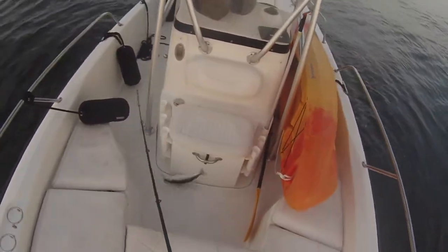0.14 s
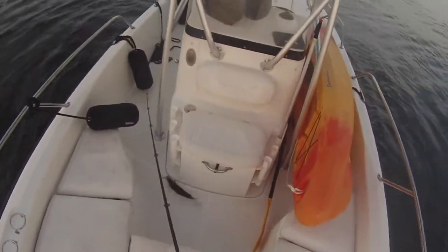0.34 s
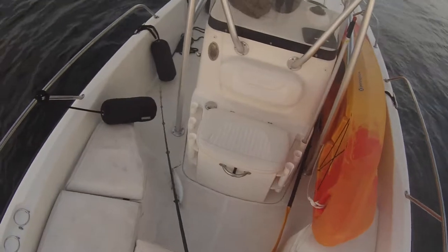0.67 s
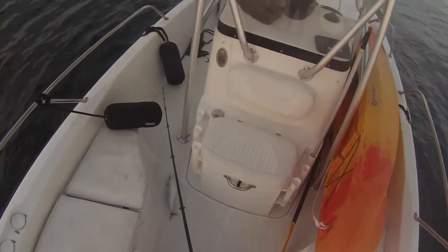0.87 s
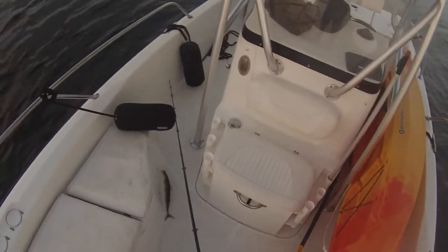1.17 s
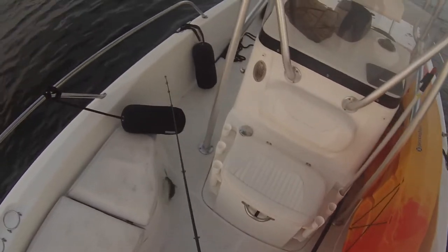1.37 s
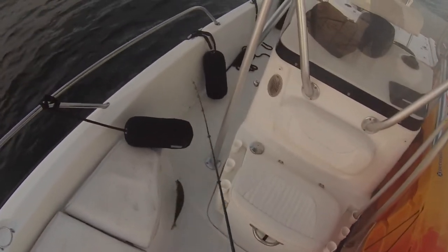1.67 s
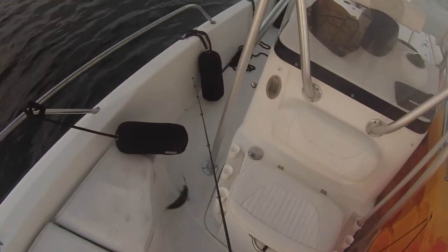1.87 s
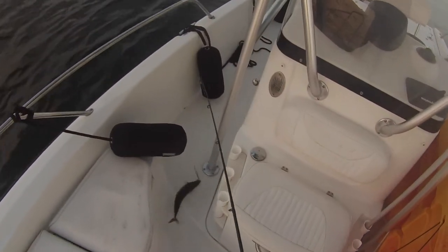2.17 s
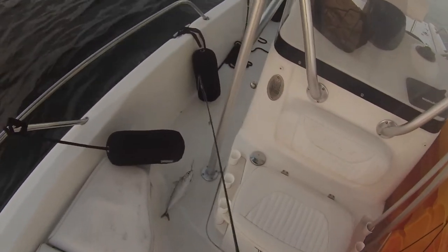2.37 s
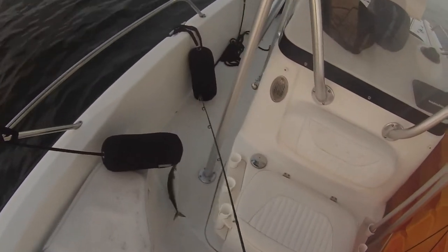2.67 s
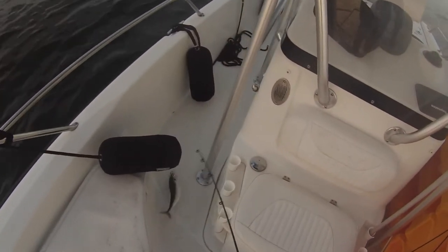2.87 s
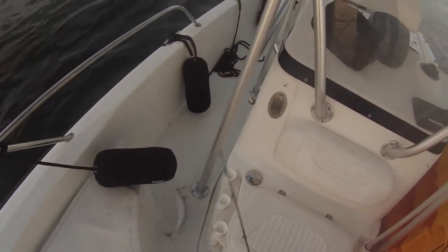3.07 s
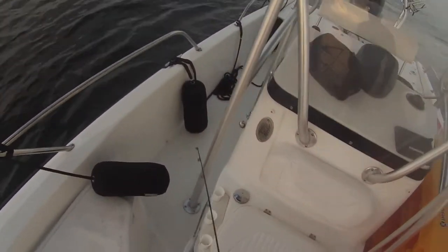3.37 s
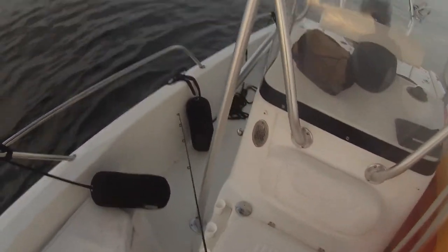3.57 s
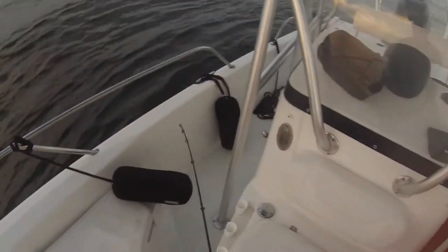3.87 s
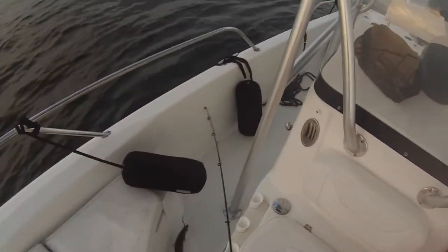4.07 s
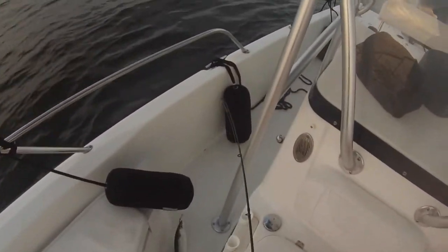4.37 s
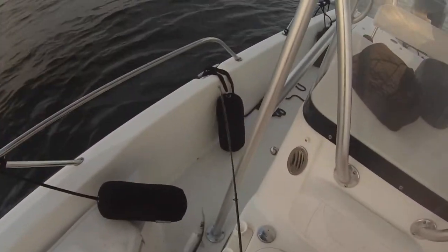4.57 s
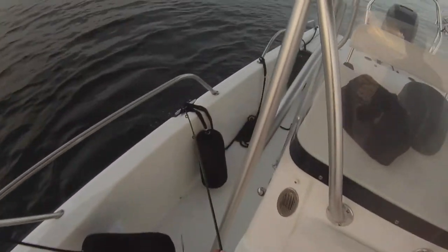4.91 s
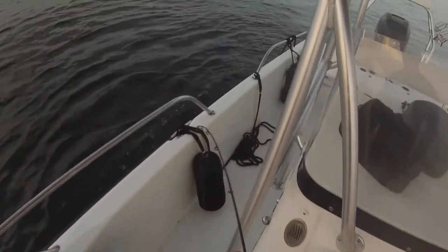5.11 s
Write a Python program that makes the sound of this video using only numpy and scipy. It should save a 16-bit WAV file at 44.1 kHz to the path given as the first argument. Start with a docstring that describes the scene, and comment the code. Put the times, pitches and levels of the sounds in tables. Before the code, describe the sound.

A small fish flops on a boat's hollow deck, light wet slaps and dull thuds over low engine rumble and soft water hiss.

```python
"""Engine rumble, a faint hum and the hiss of water and air run throughout, heard inside a closed camera case.
A fish flops on a small boat's fiberglass deck: light slaps from 0.1 s, the loudest cluster at 1.21 s.
Slaps ring deck modes and throw spray noise; dull thuds through the hull are loudest from 2.3 to 3.6 s.
Jolts are low swings of the microphone, strongest near 3.6 s; a thin metallic ring flutters at 4.7 s,
and one more strong jolt follows near 5 s. Short noise makes rubs, rattles and narrow bands of faint high hiss."""
import sys
import numpy as np
from scipy import signal
from scipy.fft import rfft, irfft
from scipy.io import wavfile
from scipy.ndimage import uniform_filter1d

SR = 44100
rng = np.random.default_rng(int(sys.argv[2]) if len(sys.argv) > 2 else 0)


def unload_wav(signal):
    """Save mono or channel-first audio to the path in sys.argv[1] as 16-bit WAV at rate SR, clipped to [-1, 1]."""
    wavfile.write(
        sys.argv[1],
        SR,
        np.round(np.clip(np.atleast_2d(signal).T, -1, 1) * 32767).astype(np.int16),
    )


N = 231354
T_S = np.arange(N) / SR

# Hiss level. Each row: time in seconds, then nominal low, middle and high band levels in dB.
WASH_LEVELS = [(0.0, -58, -61.5, -67), (0.16, -57, -59.5, -66), (0.38, -56, -62, -67),
               (0.7, -57.5, -61, -67), (1.2, -57.5, -63, -67), (1.59, -57, -62.5, -67),
               (1.74, -58.5, -58, -65.5), (1.93, -57, -61.5, -66.5), (3.2, -58.5, -64, -66),
               (3.54, -53, -59, -66), (3.75, -57.5, -62, -67), (4.05, -58, -62, -67),
               (4.4, -58, -65.5, -67.2), (4.86, -56, -63.5, -67), (5.25, -58, -64.5, -67)]
# Hiss spectrum. Each row: frequency in Hz, relative density in dB per Hz.
WASH_SPECTRUM = [(35, -39), (60, -3), (85, -5), (152, -6.5), (375, -11), (422, -11), (463, -11.5),
                 (508, -12.5), (866, -15), (1350, -15.5), (1660, -15), (2090, -10.5), (2830, -17.5),
                 (4940, -25), (15400, -41)]
# Resonances of the hollow camera case. Each row: centre in Hz, width in Hz, lift in dB before halving.
CASE_RESONANCES = [(1335, 84, 15.5), (1970, 200, -14)]
# Independent noise, opposite in the two channels, so the two channels differ slightly. # Each row: frequency in
# Hz, level in dB relative to the common noise.
WIDENING_SPECTRUM = [(60, -62), (130, -54), (290, -35), (640, -22.5), (1410, -32.5), (3100, -18),
                     (6820, -9), (15000, -22)]
# Engine rumble level. Each row: time in seconds, level in dB before the lumps.
RUMBLE_LEVELS = [(0.0, -57.5), (0.2, -45.5), (0.5, -46), (0.62, -45), (0.78, -53.5), (0.91, -43),
                 (1.1, -52.5), (1.3, -45.5), (1.5, -53), (1.8, -48), (2.1, -49.5), (2.55, -51.5),
                 (2.95, -46.5), (3.3, -44.5), (4.0, -45), (4.4, -49), (4.85, -42), (5.25, -48)]
# Engine rumble spectrum. Each row: frequency in Hz, relative density in dB per Hz.
RUMBLE_SPECTRUM = [(5.9, -31), (10, 2), (27, -0.5), (41, 0), (58, -9.5), (63, -12.5), (71, -22), (130, -24),
                   (170, -55), (290, -120)]
# Hum level. Each row: time in seconds, level in dB before the wavering.
HUM_LEVELS = [(0.0, -68.5), (0.6, -84), (1.38, -69), (1.7, -74.5), (2.95, -67), (3.6, -72), (3.82, -61.5),
              (4.2, -70.5), (4.7, -65.5), (5.25, -74)]
# Jolts of the camera on its mount. Each row: crest time in seconds, swing level in dB, frequency in Hz,
# Gaussian length (sigma) in seconds, direction +-1, lead of the envelope over the crest in seconds.
JOLTS_TABLE = [(1.361, -35.5, 25, 0.012, 1, .001), (1.658, -36, 30, .012, 1, .001),
               (1.735, -35.5, 25, 0.017, 1, .001), (3.252, -33, 29.8, 0.022, 1, .001),
               (3.375, -35.5, 38, 0.016, 1, .001), (3.566, -13.5, 36.8, 0.013, 1, .003),
               (3.629, -11, 43, 0.008, -1, 0.00093), (3.647, -10, 39.3, 0.011, 1, 0.00078),
               (3.702, -24, 29.5, 0.016, 1, .001), (3.837, -31.5, 31.2, 0.014, 1, .001),
               (4.982, -13.5, 32, 0.014, 1, 0.004)]
# Brief rubs, rattles and narrow bands of faint high hiss. Each row: start in seconds, length in seconds,
# level in dB before the edge fades, centre in Hz, width in Hz.
SLIDES_TABLE = [(.851, .007, -65.5, 6000, 3500), (1.2106, 0.0047, -40.5, 5930, 907),
                (3.442, 0.018, -48.5, 602, 500), (3.478, 0.038, -54.5, 2000, 3200),
                (3.48, .035, -52, 513, 153), (3.556, 0.046, -73, 11150, 160),
                (3.627, 0.008, -47, 1690, 3040), (3.628, 0.0072, -59.5, 6000, 8900),
                (3.644, 0.0068, -46, 1390, 2200), (3.645, .005, -60, 7000, 8950),
                (3.672, 0.052, -56.5, 1750, 1300), (3.899, 0.0063, -52.5, 2510, 3980),
                (4.204, .008, -56, 1990, 2000), (4.712, .065, -75, 12460, 497),
                (4.734, 0.032, -64.5, 6300, 1800), (4.795, .012, -70, 5850, 250),
                (4.922, .008, -68, 8970, 9000), (4.924, 0.033, -52.5, 506, 402)]
# Dull blows through the hull. Each row: start in seconds, level in dB before the swell and decay,
# frequency in Hz, t60 in seconds.
THUDS_TABLE = [(0.12, -38.5, 270, 0.068), (.211, -32.5, 250, 0.041), (.561, -37, 246, 0.038),
               (1.250, -32, 109, 0.052), (1.264, -41, 130, .035), (1.333, -42.5, 418, 0.099),
               (2.318, -28, 165, .024), (3.273, -25.5, 140, 0.034), (3.532, -29, 109, .048),
               (3.626, -28.5, 172, 0.068), (4.75, -48, 440, .06)]
# Wet slaps and ticks. Each row: start in seconds, nominal level in dB, pitch of the struck spot in Hz,
# nominal treble share in dB, spread to the whole deck 0-1.
SLAPS_TABLE = [(0.119, -44, 1350, -18, 0.3), (0.177, -40, 1340, -28, 0.3), (0.213, -43, 1340, -9, 0.74),
               (0.326, -47, 1320, -25, .5), (0.567, -42.5, 1250, -18, .45), (1.006, -43.5, 1370, -12, 0.7),
               (1.024, -41, 2470, -19, .6), (1.079, -51.5, 2060, 1, .55), (1.21, -17.5, 1980, -28, 0.6),
               (1.2165, -18.5, 2140, -40, 0.29), (1.218, -28, 870, -32, 0.45),
               (1.2235, -31, 1830, -27, 0.5), (1.238, -35, 1900, -18, 0.7), (1.337, -38.5, 605, -15, .8),
               (1.368, -39.5, 2060, -17, 0.5), (1.568, -37.5, 1430, -19, 0.62),
               (1.599, -44.5, 1280, -12, 0.53), (1.823, -45, 686, -21, .55), (2.39, -48, 2020, -21, 0.4),
               (2.469, -49, 2100, -19, 0.1), (2.899, -53, 1120, -12, 0.3), (2.932, -40.5, 1430, -25, .45),
               (3.444, -35.5, 1360, -13, 0.6), (3.905, -33.5, 1290, -22, 0.52),
               (3.934, -48.5, 1330, -5.5, .6), (4.079, -47, 592, -18, .55), (4.1, -40, 1274, -11, 0.37),
               (4.212, -35, 2386, -23, .3), (4.531, -39, 2280, -7, 0.7), (4.684, -47.5, 2120, -7.5, 0.8),
               (4.712, -43.5, 2100, -6.5, .55), (4.744, -40, 630, -19, 0.53),
               (4.876, -38.5, 1955, -28, 0.13), (4.899, -48, 1450, -23, 0.4), (5.021, -48, 2250, -20, 0.5)]
# Deck modes. Each row: frequency in Hz, relative level in dB, t60 in seconds.
DECK_MODES = [(514, 2.5, 0.046), (865, -1.5, .065), (1244, 2, 0.084), (1362, 4.5, 0.04), (1936, 4, 0.086),
              (2046, 4.5, 0.033), (2354, 6, 0.078), (2890, 3.5, 0.048), (3430, -33, .045),
              (4450, -20, 0.066), (5750, -16, .03), (6960, -15, .03)]
# Spray spectrum of a slap. Each row: frequency in Hz, relative density in dB per Hz.
SPRAY_SPECTRUM = [(350, -54), (600, -14.5), (872, -13.5), (1370, -8), (1610, -9.5), (1970, -3.5),
                  (2680, -11.5), (3320, -9), (3720, -28), (5990, -26), (9000, -45), (11700, -72),
                  (19800, -120)]
# Fine droplet spectrum. Each row: frequency in Hz, relative density in dB per Hz.
DROPLET_SPECTRUM = [(2060, -28), (3500, -1.5), (4100, -6), (4920, -4), (5730, -4.5), (8720, -16.5),
                    (15000, -41)]

FRAME, HOP = 512, 128  # samples
PATCH_RMS_DB, FLICKER_RMS_DB = 1.25, 0.57
LUMP_S, LUMP_RMS_DB = 0.038, 2
HUM_HZ, WAVER_RMS_HZ, WAVER_S = 158, 2.5, 0.056
HUM_SWELL_RMS_DB, HUM_SWELL_S = 2.1, 0.088
RING_START_S, RING_HZ, RING_DB = 4.712, 4480, -61.5
RING_RISE_S, RING_HOLD_S, RING_T60_S = 0.033, 0.03, 0.22
# Stop level relative to the swing at 0 dB, and its further change per dB of jolt level.
STOP_DB, STOP_GROWTH_DB_PER_DB = -11.5, 0.66
THUD_RISE_S = 0.0052
STRIKE_T_S = np.arange(SR // 5) / SR
SLAP_T60_S, SPOT_T60_S, CONTACT_S = 0.063, 0.031, 0.00091
FAR_MODE_DB_PER_OCT2 = 13  # loss per squared octave from the struck spot at spread 0.5
CASE_CUTOFF_HZ, RECORDER_CUTOFF_HZ = 13800, 15250


def gain_of(db):
    """Amplitude ratio from dB."""
    return 10 ** (np.asarray(db) / 20)


def evened(x):
    """Scales x to rms 1."""
    return x / np.sqrt(np.mean(x ** 2) + 1e-20)


def read(points, hz):
    """Interpolates a spectrum table over log frequency."""
    point_hz, value = np.transpose(points)
    return np.interp(np.log(hz + 1), np.log(point_hz + 1), value)


def level_at(points):
    """Interpolates a level table in dB over the scene."""
    return np.interp(T_S, *np.transpose(points))


def coloured(x, spectrum):
    """Filters x by a spectrum table."""
    hz = np.fft.rfftfreq(len(x), 1 / SR)
    return irfft(rfft(x) * gain_of(read(spectrum, hz)), len(x))


def slow(seconds):
    """Smooth random drift of rms 1 over the given time scale."""
    size = round(seconds * SR)
    once = uniform_filter1d(rng.standard_normal(N), size)
    return evened(uniform_filter1d(once, size))


def add(mix, start_s, sound):
    """Adds sound to mix in place, cut at the end."""
    part = mix[round(start_s * SR):][:len(sound)]
    part += sound[:len(part)]


def wash():
    """Hiss of water and air in drifting patches, lifted at case resonances, with a faint noise that differs
    between the channels."""
    frames, hz = N // HOP + 5, np.fft.rfftfreq(FRAME, 1 / SR)
    a, b, c, d, patches = rng.standard_normal((frames, len(hz), 5)).T
    patches = evened(uniform_filter1d(uniform_filter1d(patches, 6, 0), 16, 1))
    flicker = evened(uniform_filter1d(rng.standard_normal(frames), 3))  # small splashes touch all pitches

    case_lift = sum(0.5 * gain_of(db) / (1 + (2 * (hz - centre_hz) / width_hz) ** 2)
                    for centre_hz, width_hz, db in CASE_RESONANCES)
    spectrum = gain_of(read(WASH_SPECTRUM, hz)) * (1 + case_lift)
    above_low, high = (1 / (1 + (edge_hz / (hz + 1)) ** 6) for edge_hz in (950, 3300))
    bands = (1 - above_low, above_low - high, high)

    point_s, *levels_db = np.transpose(WASH_LEVELS)
    frame_s = np.arange(frames) * HOP / SR
    field = 0
    for band, band_db in zip(bands, levels_db):
        part = band * spectrum
        level = gain_of(np.interp(frame_s, point_s, band_db))
        field = field + np.outer(part / np.linalg.norm(part), level)
    field = field * gain_of(PATCH_RMS_DB * patches + FLICKER_RMS_DB * flicker)

    common = a + 1j * b
    widening = gain_of(read(WIDENING_SPECTRUM, hz))[:, None] * (c + 1j * d)
    channels = np.array([common + widening, common - widening]) * field
    return signal.istft(channels, nperseg=FRAME, noverlap=FRAME - HOP)[1][:, :N]


def engine():
    """Lumpy noise rumble carried by the hull, with one wavering sine hum above it."""
    rumble_db = level_at(RUMBLE_LEVELS) + LUMP_RMS_DB * slow(LUMP_S)
    rumble = gain_of(rumble_db) * evened(coloured(rng.standard_normal(N), RUMBLE_SPECTRUM))
    hum_hz = HUM_HZ + WAVER_RMS_HZ * slow(WAVER_S)
    hum = np.sqrt(2) * np.sin(2 * np.pi * np.cumsum(hum_hz) / SR)
    hum_db = level_at(HUM_LEVELS) + HUM_SWELL_RMS_DB * slow(HUM_SWELL_S)
    return rumble + gain_of(hum_db) * hum


def metal_ring():
    """One small metal part sings for a moment, its pitch and level fluttering as it rattles."""
    t = T_S - RING_START_S
    hz = RING_HZ + 16 * slow(0.008)
    tone = np.sqrt(2) * np.sin(2 * np.pi * np.cumsum(hz) / SR)
    fade_db = -60 * np.maximum(t - RING_RISE_S - RING_HOLD_S, 0) / RING_T60_S
    rise = np.clip(t / RING_RISE_S, 0, 1)
    return rise * gain_of(RING_DB + fade_db + 3.2 * slow(0.0057)) * tone


def jolts():
    """Each jolt swings the microphone back, forth and back; a hard stop sharpens the crest."""
    out = np.zeros(N)
    for crest_s, db, hz, sigma_s, direction, lead_s in JOLTS_TABLE:
        t = T_S - crest_s
        swing = np.cos(2 * np.pi * hz * t) * np.exp(-0.5 * ((t + lead_s) / sigma_s) ** 2)
        stop_envelope = np.exp(-0.5 * ((t + lead_s) / (0.6 * sigma_s)) ** 2)
        stop = np.cos(2 * np.pi * 2.4 * hz * t) * stop_envelope
        stop_gain = gain_of(STOP_DB + STOP_GROWTH_DB_PER_DB * db)
        out += np.sign(direction) * gain_of(db) * (swing + stop_gain * stop)
    return out


def slide(length_s, db, hz, width_hz):
    """A rub, a rattle or a narrow band of faint high hiss: grainy noise around one frequency."""
    size, block = round(length_s * SR), SR // 10
    grains = rng.standard_normal(block) * rng.exponential(1, block)
    band = 1 / (1 + (2 * (np.fft.rfftfreq(block, 1 / SR) - hz) / width_hz) ** 4)
    noise = irfft(rfft(grains) * band)[:size]
    return gain_of(db) * evened(noise) * signal.windows.tukey(size, 0.5)


def thud(db, hz, t60_s):
    """A soft body lands slowly, so the decaying hull tone swells for a few ms."""
    t = STRIKE_T_S
    swell = 1 - np.exp(-t / THUD_RISE_S)
    return gain_of(db - 60 * t / t60_s) * swell * np.sin(2 * np.pi * hz * t)


def slap(db, hz, treble_db, spread):
    """A short ragged contact rings the struck spot and the deck modes, and throws a burst of spray."""
    t = STRIKE_T_S
    # The soft body presses in, then lets go.
    push = rng.standard_normal(len(t)) * t * np.exp(-t / CONTACT_S)
    spot = gain_of(-60 * t / SPOT_T60_S) * np.sin(2 * np.pi * hz * t)
    deck = np.zeros(len(t))
    for mode_hz, mode_db, t60_s in DECK_MODES:
        far_db = FAR_MODE_DB_PER_OCT2 * (1.5 - spread) * np.log2(mode_hz / hz) ** 2
        deck += gain_of(mode_db - far_db - 60 * t / t60_s) * np.sin(2 * np.pi * mode_hz * t)
    spot, deck = (signal.fftconvolve(push, response)[:len(t)] for response in (spot, deck))
    rung = (1 - spread) * spot / abs(spot).max() + spread * deck / abs(deck).max()

    spray = evened(coloured(rng.standard_normal(len(t)), SPRAY_SPECTRUM))
    droplets = evened(coloured(rng.standard_normal(len(t)), DROPLET_SPECTRUM))
    burst = 0.6 * spread * spray * (1 - np.exp(-t / 0.0021))
    burst += 0.97 * gain_of(treble_db - 25 * t / SLAP_T60_S) * droplets  # treble fades faster
    burst *= (1 - np.exp(-t / 0.0023)) * gain_of(-60 * t / SLAP_T60_S)
    return gain_of(db) * (0.88 * rung + burst)


def fish():
    """The flopping body's slaps and thuds, together with all slides."""
    out = np.zeros(N)
    for sound, table in ((slide, SLIDES_TABLE), (thud, THUDS_TABLE), (slap, SLAPS_TABLE)):
        for start_s, *settings in table:
            add(out, start_s, sound(*settings))
    return out


def scene():
    """Every source is the same in both channels except a faint noise, added with the hiss, that differs between
    them."""
    return wash() + engine() + metal_ring() + jolts() + fish()


def record(dry):
    """The case dulls the highest treble; then the band limit of the recorder."""
    dulled = signal.lfilter(*signal.butter(3, CASE_CUTOFF_HZ, fs=SR), dry)
    band_limit = signal.firwin(511, RECORDER_CUTOFF_HZ, window=("kaiser", 9), fs=SR)
    return signal.oaconvolve(dulled, band_limit[None], "same")


dry = scene()
out = record(dry)
unload_wav(out)
```